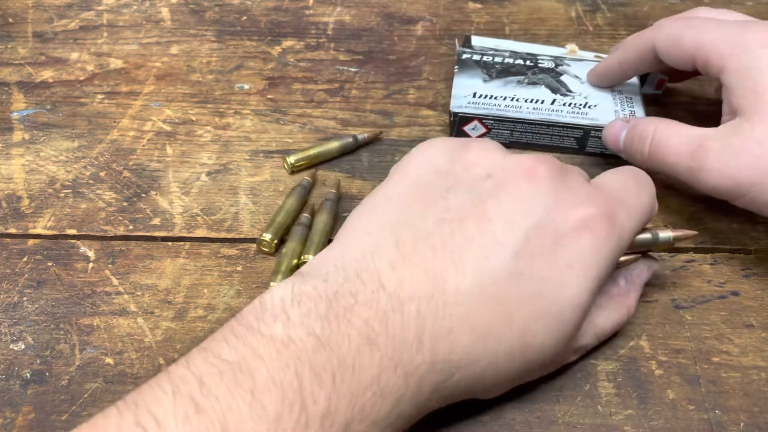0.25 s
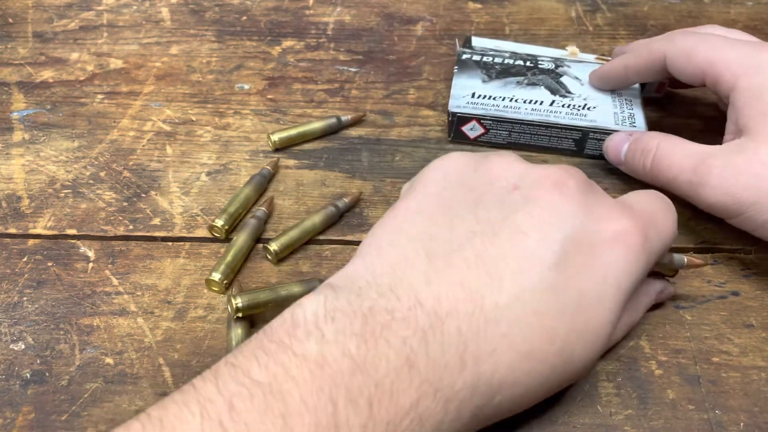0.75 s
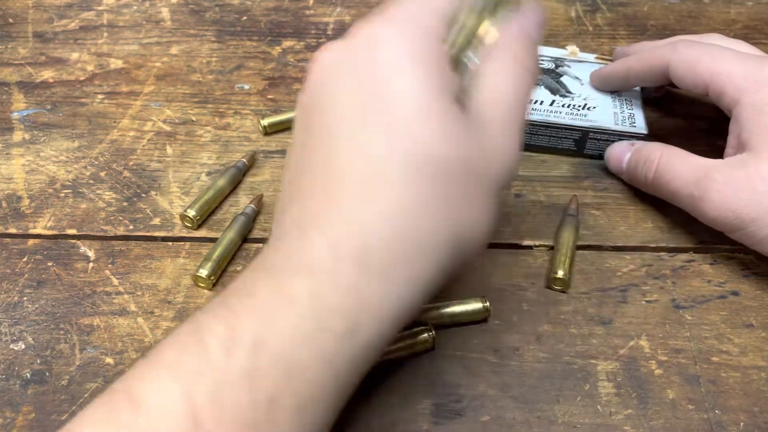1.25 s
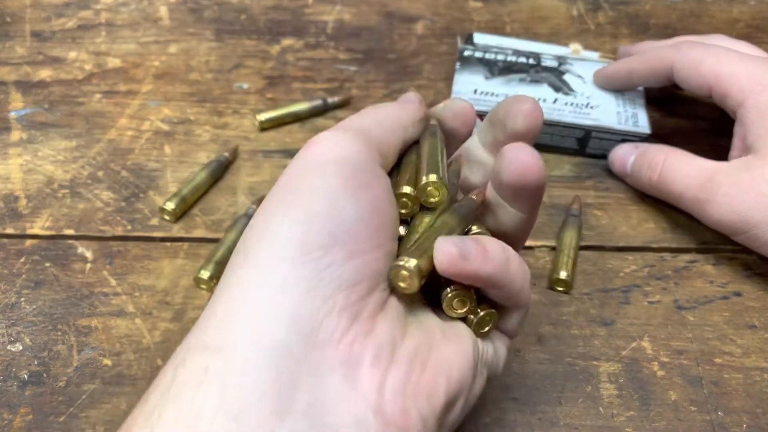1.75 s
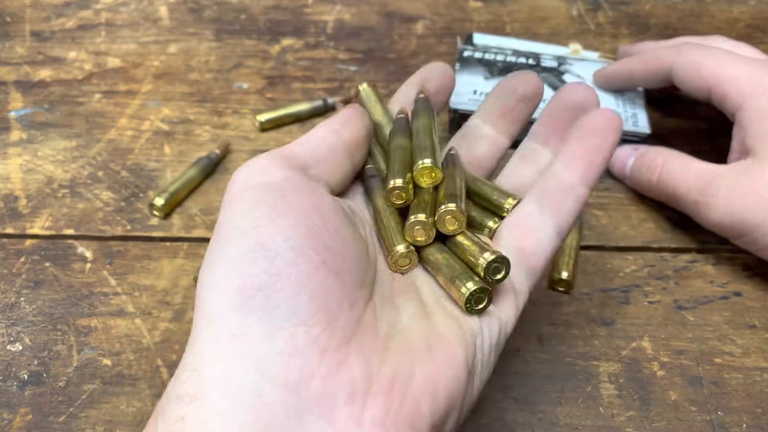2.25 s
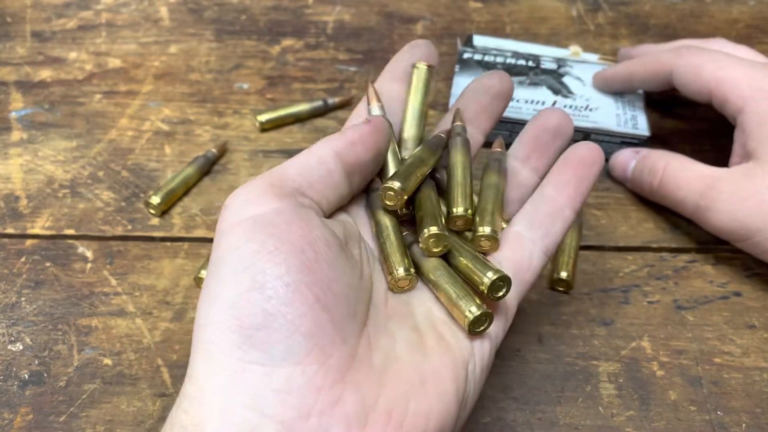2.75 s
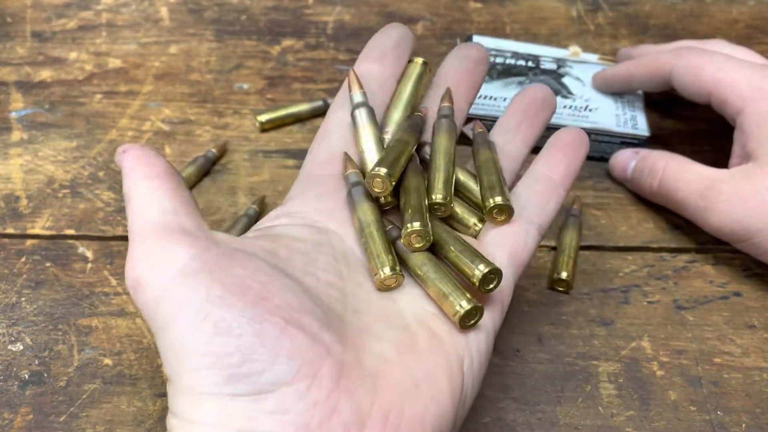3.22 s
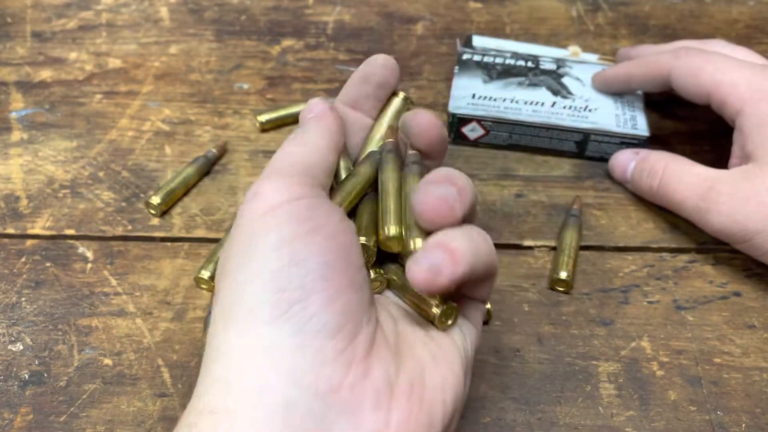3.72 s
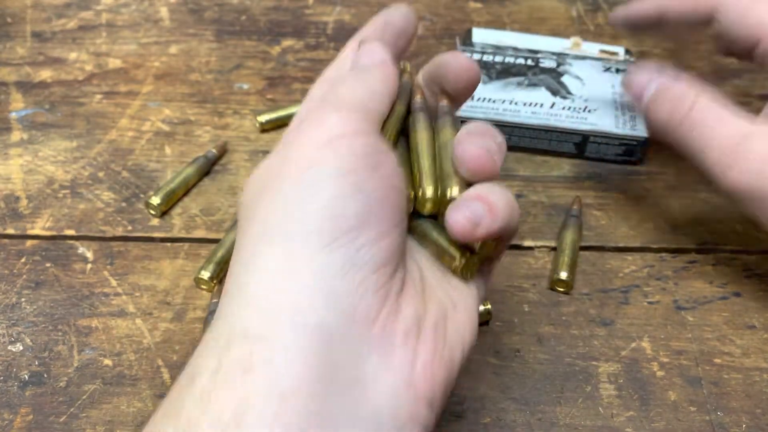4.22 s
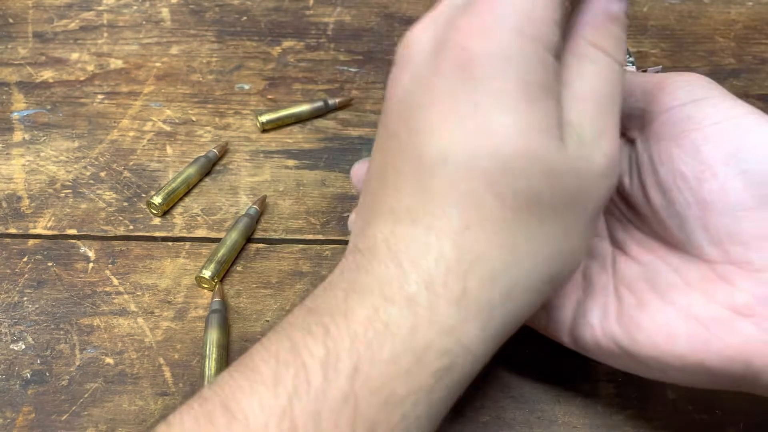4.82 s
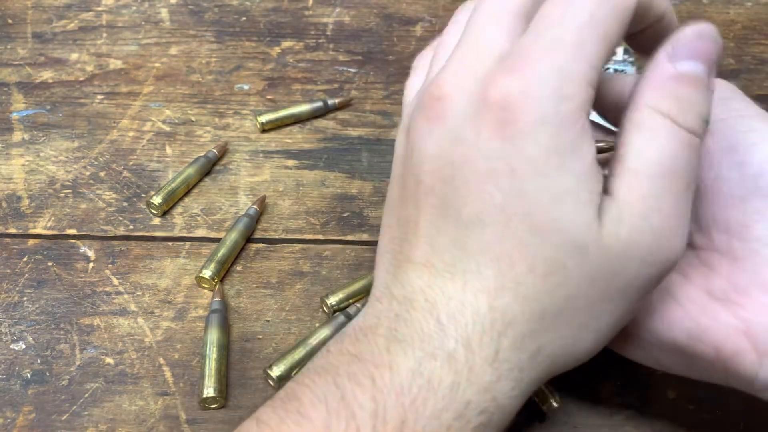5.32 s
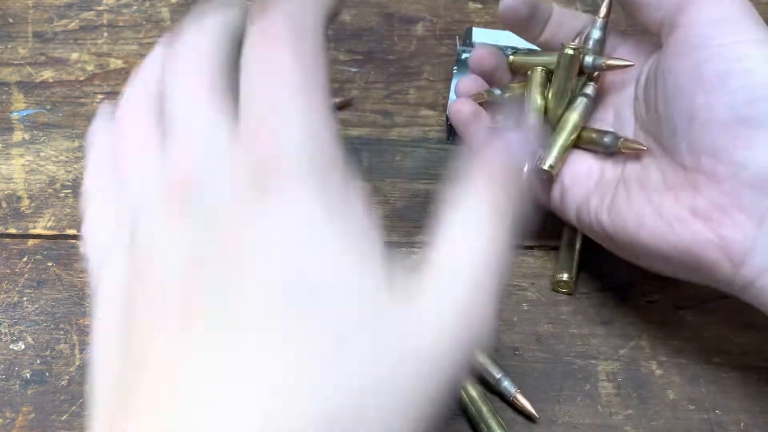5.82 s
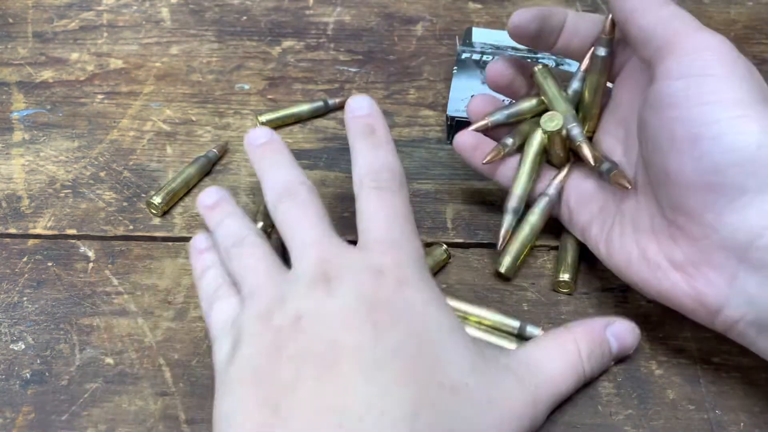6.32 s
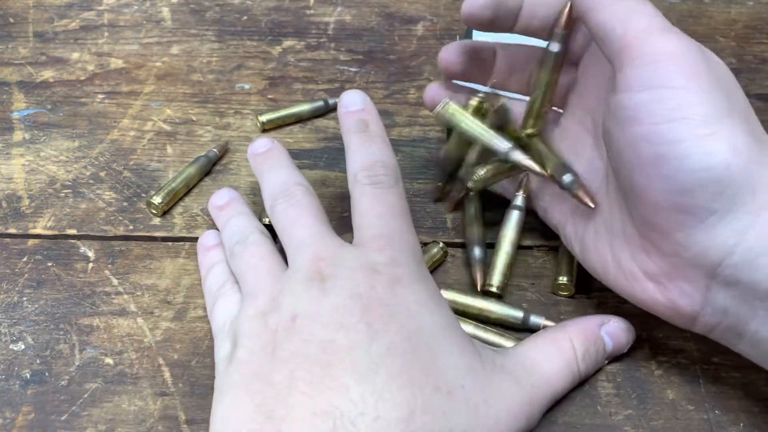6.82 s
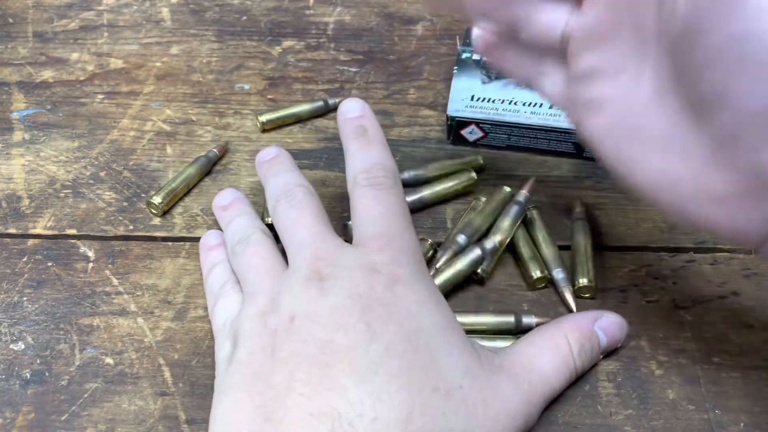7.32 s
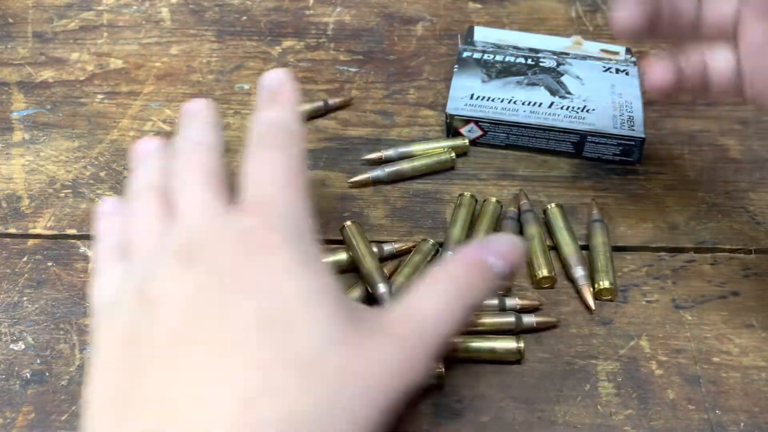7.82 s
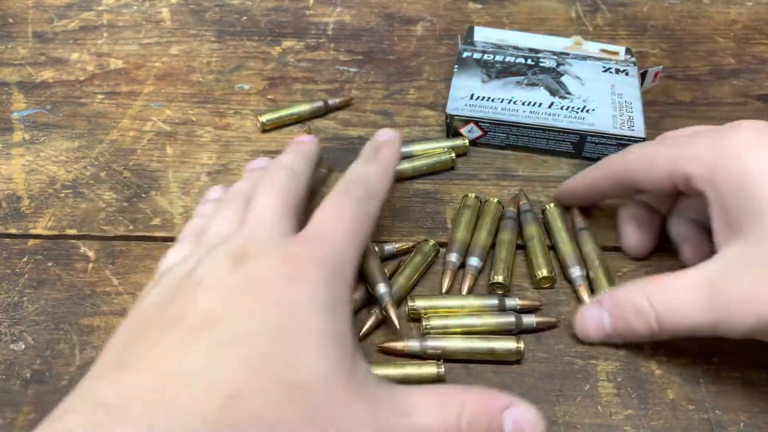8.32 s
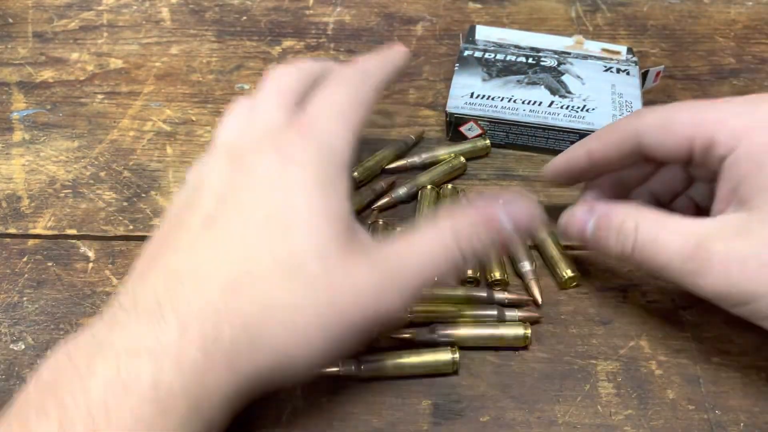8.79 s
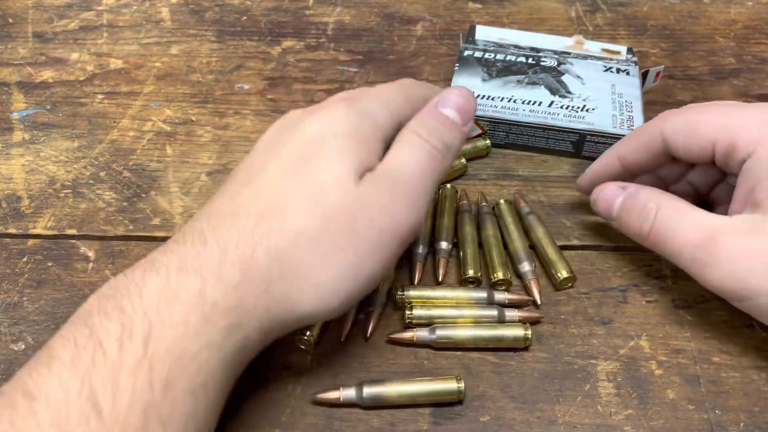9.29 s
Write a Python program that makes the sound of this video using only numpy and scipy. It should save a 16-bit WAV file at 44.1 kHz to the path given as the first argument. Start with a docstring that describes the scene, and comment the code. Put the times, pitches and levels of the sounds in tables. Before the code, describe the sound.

A handful of brass rounds is scooped, jiggled and poured back onto a wooden table.

```python
"""Hands move brass rifle cartridges over a wooden table, close to a small stereo microphone in a small room.
At first cartridges knock and roll on booming boards while skin slides on wood and brass clinks in three high modes.
From about 1.2 s clinks, faint jingles and short dull taps go on; a soft low thump comes now and then.
Dense knocks and clinks return from 5.2 to 5.6 s and from 6.1 to 7.6 s, then lighter handling follows to the end.
Impacts are dying modes and noise bursts, slides are shaped noise; a short room tail and faint air lie under all."""
import sys
import numpy as np
from scipy import signal
from scipy.fft import rfft, irfft, next_fast_len
from scipy.io import wavfile
from scipy.ndimage import uniform_filter1d

SR = 44100
rng = np.random.default_rng(int(sys.argv[2]) if len(sys.argv) > 2 else 0)


def bounce(signal):
    """Save signal as a 16-bit WAV file at the path given by the first command-line argument."""
    frames = np.transpose(np.atleast_2d(signal))
    limited = np.clip(frames, -1, 1)
    pcm = np.round(limited * 32767).astype(np.int16)
    wavfile.write(sys.argv[1], SR, pcm)


def voltage_ratio(decibels):
    """Convert decibels (scalar or array-like) to amplitude ratios, 20 dB per decade."""
    exponent = np.asarray(decibels, float) / 20
    return 10 ** exponent


N = 421140

# a cartridge lands on the table:
# (time [s], nominal knock peak [dB], boom over knock [dB], snap over knock [dB], favoured table mode [Hz])
LANDINGS = [(0.002, -31.5, -4, -7, 775), (0.163, -6.5, -20.5, -4, 1350), (0.309, -31, -9, -1, 1470),
            (0.338, -19, -16, -12, 1673), (0.369, -19.5, -15, -12, 1740), (0.408, -14, -4.5, -25, 1140),
            (0.434, -9.5, -14.5, -17, 1140), (0.507, -12.5, -11, -14.5, 1410), (0.529, -22, -15, -20, 1160),
            (0.551, -16.5, -5, -7.5, 1140), (0.586, -21.5, -20, -6.5, 1140), (0.605, -33, -2, -16, 1140),
            (0.68, -39, -9, -7, 1490), (0.743, -29.5, -5.5, -1.5, 517), (0.847, -35, -1, -5.5, 446),
            (0.974, -28, -2, -37, 690), (1.034, -26, 2, -38, 910), (1.053, -9, -14, -17, 865),
            (1.094, -11.5, -11, -18, 874), (1.133, -16.5, -9, -16, 1180), (1.157, -25, -6, -21, 1210),
            (5.214, -4, -12, -26, 1672), (5.247, -16, -15, -32, 476), (5.298, -3, -11, -5.5, 1710),
            (5.352, -4, -11.5, -39, 642), (5.371, -14, -19, -28, 1650), (5.424, -14, -22, -20, 1710),
            (5.455, -18.5, -6, -19, 528), (5.487, -18.5, -7, -16, 1640), (5.499, 4, -18.5, -11, 1665),
            (5.539, -33, -11, 8, 1620), (5.56, -11, -11.5, 4.5, 1646), (5.588, -19.5, -6, -2, 1610),
            (6.143, -32, -8, -24, 1590), (6.205, -30.5, -1, -28, 690), (6.242, -28.5, 2, -29, 1090),
            (6.277, -13.5, -6, -45, 880), (6.309, -23.5, -3.5, -32, 603), (6.353, -14, -3.5, -41, 900),
            (6.474, -27, -8, -27, 1547), (6.49, -29.5, -6, -33, 760), (6.655, -49, 6.5, -25, 300),
            (6.805, -17, -10, -20, 876), (6.812, -7, -17, -33, 390), (6.822, -10.5, -16, -37, 1276),
            (6.889, 0.5, -12.5, -27, 1233), (6.934, -25, -10, -22, 1060), (6.955, -11.5, -10, -23, 1000),
            (6.991, -9, -8, -7, 1320), (6.996, 1, -12, -10, 1265), (7.013, -8, -19, -16, 1220),
            (7.038, -10, -9, -18, 1315), (7.054, -8, -15, -16, 1280), (7.074, -12, -5, -21.5, 1220),
            (7.128, -17.5, -4, -21, 1250), (7.174, -5, -11, -9.5, 1180), (7.208, -8.5, -11, 2, 1260),
            (7.267, -18.5, -4.5, -1, 1270), (7.29, -13.5, -9.5, 2.5, 1860), (7.316, -25.5, -16, 7.5, 1012),
            (7.388, -12.5, -16, -3, 1310), (7.423, -10.5, -8.5, -13, 1640), (7.438, -25, -3, -4, 1600),
            (7.463, -12, -12, -20, 1230), (7.495, -12, -18, -19, 680), (7.531, -7, -14, -19.5, 1314),
            (7.557, -13.5, -9, -20, 1280), (7.593, -14, -19.5, -17.5, 900), (7.616, -18.5, -18, -29, 1370),
            (7.638, -21, -13, -19, 857), (7.826, -39, -11, -22, 1460), (7.922, -44, -13, -7, 420),
            (7.97, -31.5, -8, -36, 426), (8.03, -40, -2, -25, 454), (8.143, -40, 0, -27, 460),
            (8.194, -38.5, -0.5, -20, 423), (8.262, -34.5, -14, -21, 438), (8.276, -30.5, -3, -25, 413),
            (8.323, -31, -11, -9, 760), (8.439, -28.5, -1.5, -32, 770), (8.462, -30, -7, -25, 470),
            (8.522, -28, -3.5, -25, 440), (8.537, -27.5, -12, -25, 1180), (8.564, -26, -6, -32, 740),
            (8.592, -35, -7, -24, 416), (8.619, -32.5, -2, -32, 443), (8.635, -43, -2, -26, 430),
            (8.725, -29, 2, -33, 730), (8.751, -10.5, -15, -29, 1284), (8.768, -17, -26, -10, 1074),
            (8.778, -23.5, -2, -22, 1050), (8.792, -20.5, -10, -22, 915), (8.806, -24.5, -6, -22, 920),
            (8.952, -22, -1, -37, 824), (8.972, -13, -8.5, -21.5, 852), (8.993, -25, -1, -26, 830),
            (9.023, -22, -3, -18, 655), (9.057, -28, -5, -28, 856), (9.093, -27.5, -1, -36, 800),
            (9.138, -28.5, -12, -33, 1166), (9.271, -32, -15, -7, 1090), (9.405, -39, 2, -10, 523)]
# a hand pushes over the table, levels at the top of the swell:
# (start [s], length [s], rolling [dB], skin on wood [dB], skin on brass [dB])
HAND_PUSHES = [(-.15, 0.34, -39, -44.5, -52), (.2, 0.6, -45, -44.5, -60), (.7, 0.53, -52, -92, -79),
               (1.14, 0.29, -50, -85, -63.5), (4.1, 0.42, -64.5, -66, -66), (5.72, 0.25, -65, -58, -56.5),
               (5.93, 0.57, -49.5, -55, -55.5), (6.5, 0.28, -56.5, -99, -99),
               (6.93, 0.69, -40.5, -32.5, -58), (7.75, 0.59, -52.5, -75, -66.5),
               (8.2, 0.62, -38.5, -74, -54.5), (8.72, 0.194, -53, -48, -54.5), (8.9, 0.4, -41.5, -81, -71),
               (9.2, 0.42, -46, -88, -60)]
# a handful of cases shifts and jingles, levels at the top of the swell:
# (start [s], length [s], rattle [dB], skin on brass [dB])
HANDFUL_SHAKES = [(.3, 0.4, -53.5, -82.5), (1.3, 0.51, -77, -78.5), (1.68, 0.22, -61, -73),
                  (2.0, 0.25, -54, -83), (2.45, 0.16, -55, -70.5), (2.8, 0.68, -90, -86),
                  (3.38, 0.32, -55, -69), (3.8, 0.23, -68, -67.5), (4.82, 0.35, -44.5, -59.5),
                  (5.09, 0.36, -36, -43), (6.08, 0.11, -63, -59), (6.97, 0.31, -42, -49.5),
                  (8.36, 0.09, -64, -73), (9.17, 0.18, -65, -60)]
HIT_CREST_DB = 13  # nominal peak of a knock or tap over its early rms


def evened(x, span=None):
    """Scales to rms 1 over the first span samples."""
    return x / np.sqrt(np.mean(x[..., :span] ** 2) + 1e-20)


def read(points, hz):
    """Reads a curve on a log-frequency axis."""
    f, value = np.transpose(points)
    return np.interp(np.log(hz + 1), np.log(f + 1), value)


def add(mix, s, sound):
    """Mixes a sound into both channels at time s."""
    part = mix[:, round(s * SR):][:, :sound.shape[1]]
    part += sound[:, :part.shape[1]]


def colour(x, points):
    """Filters by a spectrum in dB."""
    size = x.shape[-1]
    return irfft(rfft(x) * voltage_ratio(read(points, np.fft.rfftfreq(size, 1 / SR))), size)


def band_pass(x, edges_hz, order):
    """Keeps one band of a sound."""
    return signal.sosfilt(signal.butter(order, edges_hz, "band", fs=SR, output="sos"), x)


def pair(size):
    """Two channels of noise whose likeness changes with frequency, which sets the stereo width."""
    # likeness of left and right in scattered sound: (frequency [Hz], correlation [0-1])
    likeness = [(60, 0.75), (150, 0.89), (300, 0.61), (650, 0.077), (1400, 0.84), (3000, 0.12),
                (6000, 0.98), (9000, 0.94)]
    left, other = rfft(rng.standard_normal((2, size)))
    same = np.clip(read(likeness, np.fft.rfftfreq(size, 1 / SR)), 0, 1)
    right = same * left + np.sqrt(1 - same ** 2) * other
    return irfft(np.array([left, right]), size)


def scatter(per_s, spread_db):
    """Random small impacts, a few of them large."""
    size = voltage_ratio(spread_db * np.minimum(rng.exponential(1, N), 4))
    return size * (rng.random(N) < per_s / SR) * rng.choice([-1., 1.], N)


def note(hz, t60, rise_s, size=4096):
    """One dying mode, a little apart in phase left and right."""
    t = np.arange(size) / SR
    turn = rng.random() + 0.076 * rng.standard_normal((2, 1))
    envelope = voltage_ratio(-60 * t / t60) * (1 - np.exp(-t / rise_s))
    return evened(envelope * np.sin(2 * np.pi * (hz * t + turn)), span=400)


def gesture(rows, column):
    """Level of one layer: every gesture swells and fades as a sine arch raised to a power."""
    t = np.arange(N) / SR
    return sum(voltage_ratio(row[column]) * np.sin(np.pi * np.clip((t - row[0]) / row[1], 0, 1)) ** 1.6 for row in rows)


def after_landing(layer):
    """Level of one layer that follows each landing: its power jumps and dies exponentially."""
    # levels under the landing's peak: (rolling [dB], hiss of the boards [dB], hiss on brass [dB])
    layer_db = [-21.5, -21, -50]
    decay_s = 0.24  # t60
    s, db = np.transpose(LANDINGS)[:2]
    kicks = np.bincount((s * SR).astype(int), voltage_ratio(2 * db), N)
    power = signal.lfilter([1], [1, -voltage_ratio(-120 / decay_s / SR)], kicks)
    return voltage_ratio(layer_db[layer]) * np.sqrt(power)


def board_blow(size=10000):
    """One struck spot: bending waves, plank modes and dense small modes, split in boom, thud, knock and snap."""
    # modes of the table, scattered from blow to blow: (centre [Hz], relative level [dB], t60 [s])
    boards = [(100.2, -6.5, 0.16), (113, 3, 0.17), (138.6, -3, 0.11), (262, 3, 0.12), (293, 3, 0.12),
              (403.3, -10, 0.12), (475.5, -3, 0.064), (546, -3.5, 0.088), (692, -4, 0.09), (886, -2, 0.09),
              (1065, 0, .08), (1160, -2, .07), (1270, 1, 0.1), (1410, -2, .06), (1500, -1, 0.064),
              (1670, 1, 0.07), (2150, -7.5, 0.057), (2450, -8, 0.045), (2710, -9, 0.07), (3377, -11, 0.038)]
    # bands of boom, thud, knock and snap: (low edge [Hz], high edge [Hz])
    bands_hz = [(85, 175), (185, 550), (550, 1800), (1800, 4600)]
    t, hz = np.arange(size) / SR, np.fft.rfftfreq(size, 1 / SR)
    # bending waves spread: treble arrives first, bass some ms later
    bend = irfft(np.exp(2j * np.pi * 1.3 * rng.uniform(0.8685, 1.1) * -np.log(hz + 30)), size)
    bend = 80 * bend * np.exp(-t / 0.04)
    # the plank edges send the wave back within a few ms, which gives each spot its colour
    echoes = np.zeros((2, 200))
    echoes[:, 0] = 1
    delays = rng.integers(20, 170, 4) + rng.integers(0, 8, (2, 4))
    echoes[[[0], [1]], delays] = rng.uniform(.3, .7, 4) * rng.choice([-1, 1], 4)
    bend = signal.oaconvolve(bend[None], echoes, axes=1)[:, :size]
    ring = np.zeros((2, size))
    for f, db, t60 in boards:
        # left and right drift apart in phase towards the higher modes
        turn = rng.random() + 0.2 * min(f, 700) / 700 * rng.standard_normal((2, 1))
        rise = 1 - np.exp(-(t * f / 1.2) ** 2)
        level = voltage_ratio(db + 3.2 * rng.standard_normal() - 60 * t / t60)
        ring += rise * level * np.sin(2 * np.pi * (f * rng.normal(1, .004) * t + turn))
    # the many small modes merge into noise, with a duller, longer tail
    dull = signal.lfilter(*signal.butter(2, 2400, fs=SR), pair(size))
    dense = pair(size) * voltage_ratio(-2 - 60 * t / .012) + dull * voltage_ratio(-10 - 60 * t / .15)
    dense *= 1 - np.exp(-(t / .002) ** 2)
    whole = 3.4 * bend + 1.9 * ring + 2.0 * dense
    spans = (2400, 1200, 400, 400)
    return np.array([evened(band_pass(whole, edge, 4), span=span) for edge, span in zip(bands_hz, spans)])


def table():
    """Knocks land on changing spots, each favouring one mode; rolling cases add a run of tiny bumps."""
    thud_db, thud_per_db = -10.5, 0.78  # the thud grows slower than the knock
    spot_db, spot_s = -7, .04  # level under the knock and t60 of the favoured mode
    spots, out = [board_blow() for _ in range(14)], np.zeros((2, N))
    for (s, db, boom, snap, hz), spot in zip(LANDINGS, rng.integers(0, 14, len(LANDINGS))):
        band_db = np.array([db + boom, thud_db + thud_per_db * db, db, db + snap])
        add(out, s, np.tensordot(voltage_ratio(band_db - HIT_CREST_DB), spots[spot], 1))
        add(out, s, voltage_ratio(db + spot_db - HIT_CREST_DB) * note(hz, spot_s, 0.0085))
    rolling = np.zeros((2, N))
    bump_gains = voltage_ratio(np.array([-5, 4.5, 1.5, -23.5]))  # boom, thud, knock, snap
    for spot in spots[:4]:
        bump = np.tensordot(bump_gains, spot, 1)
        rolling += signal.oaconvolve(scatter(50, 3.7)[None], bump, axes=1)[:, :N]
    return out + evened(rolling) * (gesture(HAND_PUSHES, column=2) + after_landing(layer=0))


def hiss():
    """Sliding skin and cases hiss smoothly; after each knock the boards also hiss as the blow dies away."""
    # spectra of the hiss: (frequency [Hz], relative level on wood [dB], relative level on brass [dB])
    spectra = [(150, -1, -37), (400, -8, -29), (920, 7, -4.5), (2200, -1, -4), (2990, -4.5, -7),
               (4900, -36.5, -6), (7600, -27.5, -6), (11000, -53, -12), (15450, -52.5, -19.5)]
    hz, wood_db, brass_db = np.transpose(spectra)
    on_wood = evened(colour(pair(N), list(zip(hz, wood_db))))
    on_brass = evened(colour(pair(N), list(zip(hz, brass_db))))
    wood_level = gesture(HAND_PUSHES, column=3) + after_landing(layer=1)
    brass_level = gesture(HAND_PUSHES, column=4) + gesture(HANDFUL_SHAKES, column=3) + after_landing(layer=2)
    return on_wood * wood_level + on_brass * brass_level


def air():
    """Room air is a faint steady noise, strongest in the bass."""
    # spectrum: (frequency [Hz], relative density [dB per Hz])
    spectrum = [(18, -34), (30, 3.5), (124, -5.5), (189, -14), (252, -11.5), (328, -17), (364, -13.5),
                (649, -28.5), (16000, -36)]
    return voltage_ratio(-72.5) * evened(colour(pair(N), spectrum))


def clink(tick_db, *ring_dbs, size=4096):
    """A tick that bounces twice; each mode rings in three touching cases, so it beats and flutters."""
    # modes of a cartridge, scattered from case to case: (centre [Hz], t60 before the grip of the fingers [s])
    case_modes = [(8050, 0.014), (12150, 0.016), (15520, 0.05)]
    # weaker modes that go with the tick, scattered: (centre [Hz], level against the tick's rms [dB], t60 [s])
    weak_modes = [(3190, -22, 0.032), (4840, -20, 0.02), (5500, -34.5, .025), (5870, -18.5, 0.022),
                  (6970, -14.5, 0.02), (11300, -14.5, 0.023)]
    # spectrum of the tick: (frequency [Hz], relative level [dB])
    tick_spectrum = [(200, -54.5), (500, -34.5), (1000, -18), (1600, -4.5), (3000, -7), (5000, 5.5),
                     (7000, 5), (8200, 6), (9800, 1), (11000, -16), (14000, -14.5), (16000, -18.5)]
    t = np.arange(size) / SR
    shape = voltage_ratio(-60 * t / 0.006) * (1 - np.exp(-t / 0.0003))
    late, soft = rng.random((2, 2))
    for s, db in zip(0.00085 + 0.006 * late, -6 - 12 * soft):
        shape = shape + voltage_ratio(db - 60 * (t - s) / .005) * (t > s)
    tail = voltage_ratio(-34.5 - 60 * t / 0.18)
    tick = evened(colour(pair(size) * (shape + tail), tick_spectrum), span=120)
    hz, db, t60 = np.transpose(weak_modes)[:, :, None]
    draw = rng.standard_normal((2, len(weak_modes), 1))
    weak = voltage_ratio(db + 4.5 * draw[0] - 60 * t / t60) * np.sin(2 * np.pi * hz * (1 + 0.044 * draw[1]) * t)
    tick += weak.sum(0)
    sound = voltage_ratio(tick_db) * evened(tick, span=120)
    for (hz, t60), db in zip(case_modes, ring_dbs):
        draw = rng.standard_normal((4, 3, 1))
        grip = np.exp(0.4 * np.minimum(draw[1], .8))  # fingers damp some cases more
        decay = voltage_ratio(4 * draw[2] - 60 * t / (t60 * grip))
        cases = decay * np.sin(2 * np.pi * (hz * (1 + .012 * draw[0]) * t + draw[3]))
        chatter = 1 + 0.4 * evened(uniform_filter1d(rng.standard_normal(size), 70))
        sound += voltage_ratio(db) * evened(cases.sum(0) * chatter * (1 - np.exp(-t / 0.0001)), span=130)
    return sound


def brass():
    """Brass strikes brass in clear clinks and brief rings, over a rattle of tiny clinks."""
    # the clear clinks, nominal peaks:
    # (time [s], tick [dB], low case mode [dB], middle case mode [dB], high case mode [dB])
    clear_clinks = [(0.01, -27.5, -38, -53.5, -49.5), (0.021, -36.5, -35, -51.5, -54),
                    (0.0406, -43.5, -41, -64.5, -57.5), (0.162, -34.5, -58, -60, -61),
                    (0.3032, -43, -43, -74, -55.5), (0.3316, -43.5, -38.5, -60, -45.5),
                    (0.339, -26, -36.5, -41, -32.5), (0.3423, -24, -37, -41, -40),
                    (0.4003, -27.5, -21, -49, -48), (0.4054, -26, -21, -34, -31.5),
                    (0.4121, -36.5, -17.5, -48.5, -36.5), (0.4794, -38, -39, -62, -54),
                    (0.4948, -38.5, -44, -55, -55.5), (0.5517, -42, -40.5, -57, -55),
                    (0.5643, -34, -46, -41, -47.5), (0.5762, -32, -42, -56, -44.5),
                    (0.588, -40, -47, -48, -53), (0.7442, -31, -41, -50, -43),
                    (0.8416, -37.5, -50, -69, -68.5), (0.8514, -43, -49, -64, -62),
                    (1.0872, -32, -46, -43, -43), (1.124, -43, -41, -51, -52), (1.251, -46, -64, -59, -68),
                    (1.3236, -55, -47.5, -68, -53), (1.3418, -34.5, -27.5, -66, -55.5),
                    (1.416, -48, -38, -69, -50), (1.6084, -28, -13, -30, -18.5),
                    (1.6688, -40.5, -46, -49, -49), (1.7149, -42, -25.5, -45, -29),
                    (1.7262, -40, -34, -47, -50), (1.7353, -27.5, -18.5, -39, -36),
                    (1.82, -42.5, -30.5, -30, -31), (1.8229, -33.5, -31, -30, -36),
                    (1.8556, -46, -52, -51.5, -55.5), (1.8787, -34.5, -33, -31, -37.5),
                    (1.8942, -52, -48.5, -44, -56), (1.9087, -26, -25.5, -23.5, -21.5),
                    (1.9168, -24.5, -25, -30, -29.5), (1.924, -21, -18.5, -23, -32.5),
                    (2.0509, -38, -42.5, -51, -43), (2.09, -38.5, -22.5, -50, -41),
                    (2.0967, -35, -24.5, -33.5, -28.5), (2.1035, -41.5, -32, -41, -35),
                    (2.233, -42.5, -59, -53, -64), (2.279, -48, -53, -60, -54),
                    (2.304, -38, -39.5, -53, -61), (2.349, -36, -20.5, -40, -33.5),
                    (2.355, -39, -36, -55, -45), (2.3668, -43, -40.5, -61, -54),
                    (2.4874, -19, -17, -28.5, -18.5), (2.558, -55, -51, -71, -68),
                    (2.584, -42, -41, -63, -47), (2.5875, -45, -56, -56, -37),
                    (2.6315, -34, -27, -52, -35.5), (2.6437, -42, -44, -52, -53),
                    (2.671, -25, -21.5, -33.5, -28), (2.674, -27, -36, -40, -39),
                    (2.68, -28, -37.5, -45, -39), (2.6949, -43, -33.5, -47, -49),
                    (2.7209, -53, -28, -48, -38.5), (2.7565, -38, -46, -57, -53),
                    (2.761, -45, -43.5, -67, -56), (2.8748, -50, -47, -52.5, -43),
                    (3.004, -50.5, -53.5, -78, -62), (3.0362, -46.5, -56.5, -70, -68),
                    (3.0642, -43.5, -44, -62.5, -58), (3.114, -37.5, -31, -55.5, -47),
                    (3.1398, -43, -58.5, -68, -64.5), (3.1568, -43.5, -52, -66, -65),
                    (3.3914, -58, -25.5, -44.5, -36.5), (3.3987, -46.5, -39, -57, -44),
                    (3.4359, -50.5, -31.5, -57, -54), (3.4629, -36.5, -25, -44.5, -28),
                    (3.474, -34.5, -40, -41, -38), (3.486, -25, -26.5, -34, -32.5),
                    (3.5687, -42.5, -43, -61, -61.5), (3.592, -49, -44, -60, -74),
                    (3.612, -29.5, -49, -43, -36), (3.6558, -33.5, -48, -58, -54),
                    (3.669, -47, -60, -62, -57), (3.6844, -31, -51, -43, -51), (3.7492, -41, -44, -57, -46),
                    (3.887, -33, -54.5, -55, -63), (3.8924, -34, -30, -63, -60),
                    (3.9044, -38, -45, -67, -74), (3.928, -33.5, -27, -55, -52),
                    (3.9341, -29.5, -37, -39.5, -43.5), (3.954, -35.5, -41, -48, -51),
                    (4.0023, -45.5, -45, -53, -51), (4.1032, -44.5, -67, -59, -65),
                    (4.7768, -46, -47, -60, -60), (4.791, -36, -44, -45, -38),
                    (4.7973, -32.5, -34, -53, -49), (4.8336, -39.5, -29, -55.5, -61),
                    (4.8499, -47, -32, -44, -56.5), (4.8683, -34.5, -23, -31, -44),
                    (4.8846, -35.5, -39, -35, -45), (4.906, -34.5, -15, -42, -28),
                    (4.9226, -35.5, -19.5, -30, -27), (4.956, -47, -25, -35, -27),
                    (4.969, -24.5, -20, -28, -22.5), (5.0078, -33, -26, -44.5, -41),
                    (5.0142, -33, -14.5, -29, -31.5), (5.0225, -27.5, -18.5, -35, -38),
                    (5.1, -29.5, -25, -34, -29.5), (5.1165, -24, -12.5, -32, -40.5),
                    (5.1441, -27, -38, -33, -25), (5.1498, -28, -26, -38, -25.5),
                    (5.164, -29, -28, -29, -29), (5.1751, -31.5, -24, -33.5, -35.5),
                    (5.197, -32, -24, -30, -27.5), (5.215, -38, -28.5, -43.5, -36),
                    (5.2245, -27, -18, -34.5, -35.5), (5.2398, -25, -13, -34.5, -17),
                    (5.2601, -45.5, -20, -38.5, -24.5), (5.2661, -39.5, -18, -35, -28.5),
                    (5.2803, -40.5, -23, -31, -23.5), (5.2844, -41, -15, -39, -36.5),
                    (5.3004, -20.5, -23, -40, -28.5), (5.3046, -29, -10.5, -42.5, -40.5),
                    (5.3633, -41, -40, -55.5, -53), (5.3807, -46, -37, -50, -48),
                    (5.402, -37.5, -30, -57, -48.5), (5.5003, -10.5, 2.5, -16, -12),
                    (5.6059, -34, -27, -55, -42), (5.704, -40, -33, -46, -47), (5.727, -45, -45, -65, -61),
                    (5.767, -41, -45, -55, -61), (5.8527, -41, -60.5, -54, -62),
                    (6.101, -42.5, -37, -66, -54), (6.1238, -48, -26, -59, -52),
                    (6.131, -46.5, -35, -75, -64), (6.144, -37.5, -38, -62, -47.5),
                    (6.1713, -43, -46, -63, -59.5), (6.181, -35, -26.5, -55, -38),
                    (6.1962, -36, -33, -58, -48), (6.2149, -39.5, -32, -55, -60),
                    (6.224, -40, -27, -49, -38.5), (6.2375, -31, -18.5, -37, -26.5),
                    (6.2605, -33, -22, -46, -39), (6.272, -44, -34, -49.5, -45),
                    (6.3253, -50, -25.5, -51, -39), (6.3358, -32, -38, -43, -38),
                    (6.4727, -39, -47.5, -36, -56), (6.6587, -48, -57.5, -51, -65),
                    (6.776, -39, -42, -68.5, -80), (6.803, -28.5, -46, -30, -31),
                    (6.816, -24.5, -42, -54, -50), (6.8212, -27.5, -28.5, -38, -46.5),
                    (6.8414, -28.5, -21, -37, -42), (6.853, -45, -34, -42, -41),
                    (6.8764, -34, -20.5, -30, -40), (6.904, -28, -18, -33, -21),
                    (6.9305, -27, -22, -37.5, -28.5), (6.9353, -40, -27, -36, -34),
                    (6.9607, -26, -28, -53.5, -36), (6.9684, -25.5, -30, -33, -26.5),
                    (6.991, -24.5, -15, -37, -29.5), (7.0008, -25.5, -18, -29, -21),
                    (7.016, -25.5, -13, -32, -24), (7.0448, -26.5, -17, -32, -17.5),
                    (7.0664, -30.5, -15, -30, -17.5), (7.0777, -33, -16.5, -34, -23),
                    (7.0977, -41, -26, -44, -34), (7.129, -25.5, -17, -33, -29.5),
                    (7.143, -27, -13, -28, -18), (7.1488, -30.5, -16.5, -32, -21),
                    (7.1653, -28, -22.5, -26, -19), (7.1753, -20.5, -7, -32.5, -20),
                    (7.1783, -17.5, -19, -36.5, -29), (7.184, -27, -18.5, -34.5, -30.5),
                    (7.2, -33, -20.5, -48, -35), (7.2097, -18.5, -31, -45, -38),
                    (7.235, -27.5, -24, -44, -30.5), (7.293, -8.5, -43, -54, -40),
                    (7.389, -28.5, -24, -53, -29.5), (7.4364, -38, -37, -42, -47),
                    (7.4788, -33, -32, -60, -40), (7.5026, -31, -32, -54, -35),
                    (7.587, -31.5, -36, -51, -45), (7.803, -49.5, -55, -82, -70),
                    (7.8877, -43.5, -61, -67, -68), (8.195, -28, -19, -41, -26),
                    (8.2626, -25, -17.5, -42.5, -28.5), (8.3082, -30, -40, -35, -28),
                    (8.3403, -37, -40, -57, -35.5), (8.375, -25.5, -15, -39.5, -26.5),
                    (8.4082, -24, -25.5, -41, -40.5), (8.4164, -20.5, -34, -42, -44.5),
                    (8.4345, -42, -37, -52, -51), (8.4574, -24, -20, -40, -28),
                    (8.4666, -27, -30, -47, -34), (8.519, -36, -22, -35, -35.5),
                    (8.5227, -23, -27, -43, -34), (8.5443, -41, -36, -57, -46),
                    (8.5628, -17.5, -19, -31, -26), (8.6277, -42, -32, -55, -45),
                    (8.7417, -42, -26, -54, -36.5), (8.9213, -41, -37, -59, -55),
                    (8.93, -41, -40, -61, -40), (9.1808, -29.5, -19, -48, -30), (9.227, -43, -28, -57, -34),
                    (9.2347, -49, -36, -61, -48), (9.2806, -47, -26, -61, -57),
                    (9.2894, -32, -28, -59, -50), (9.3028, -45, -31, -63, -53.5),
                    (9.35, -37, -21, -48, -34.5), (9.3852, -34, -29, -55, -40),
                    (9.3982, -40, -25, -60, -49.5), (9.4114, -34, -26, -52, -40),
                    (9.4516, -34.5, -36, -46, -37), (9.4746, -42, -39, -64, -76),
                    (9.5002, -35, -24.5, -46, -37)]
    # rms under the peak: (low case mode [dB], middle case mode [dB], high case mode [dB])
    ring_rms_db = [-3.5, -5, -5]
    # a loosely held cartridge or the cupped palm rings briefly: (time [s], early rms [dB], pitch [Hz], t60 [s])
    brief_rings = [(4.754, -72.5, 3150, 0.062), (4.788, -51, 3250, .06), (4.816, -58, 3400, .05),
                   (4.862, -58.5, 447, .15), (4.865, -51, 3040, .03), (4.884, -53.5, 3060, 0.027),
                   (2.465, -60, 874, .03)]
    tick_crest_db = 7.5  # nominal peak of a tick over its rms
    out = np.zeros((2, N))
    for s, tick_db, *ring_dbs in clear_clinks:
        add(out, s, clink(tick_db - tick_crest_db, *np.add(ring_dbs, ring_rms_db)))
    for s, db, hz, t60 in brief_rings:
        add(out, s, voltage_ratio(db) * note(hz, t60, 0.0022))
    rattle = np.zeros((2, N))
    for _ in range(3):
        tiny = clink(-11.5, 0, -11.0, -14.5)
        rattle += signal.oaconvolve(scatter(110, 3.0)[None], tiny, axes=1)[:, :N]
    return out + evened(rattle) * gesture(HANDFUL_SHAKES, column=2)


def room(x):
    """The room answers with a noisy tail, each band dying at its own speed."""
    # decay of the room: (frequency [Hz], t60 [s])
    decay = [(100, 0.5), (300, 0.54), (700, 0.51), (1800, 0.42), (5000, 0.32), (12000, 0.1), (16000, 0.27)]
    hz, t, z = signal.stft(pair(SR // 2), SR, nperseg=256)
    tail = signal.istft(z * voltage_ratio(-60 * t / read(decay, hz)[:, None]), SR, nperseg=256)[1]
    tail *= 1 - np.exp(-(np.arange(tail.shape[1]) / SR / 0.0024) ** 2)  # soft onset
    tail /= np.linalg.norm(tail[0])
    return voltage_ratio(-9.5) * signal.oaconvolve(x.mean(0)[None], tail, axes=1)[:, :N]


def thumps():
    """A palm or wrist settles on the table: a soft low sine that dies fast."""
    # (time [s], level before a common lift [dB], pitch [Hz])
    settlings = [(1.605, -57.5, 153), (4.399, -43, 106), (5.986, -34.5, 104.7), (6.597, -35.5, 136),
                 (7.967, -35.5, 102), (8.175, -28.5, 68.6), (8.797, -24.5, 108)]
    lift_db = 6.5
    out, t = np.zeros((2, N)), np.arange(8000) / SR
    for s, db, hz in settlings:
        envelope = voltage_ratio(db + lift_db - 60 * t / 0.1) * (1 - np.exp(-t / 0.014))
        add(out, s, np.tile(envelope * np.sin(2 * np.pi * hz * t), (2, 1)))
    return out


def taps():
    """Dull taps hardly ring: each is a short noise puff with a hollow note."""
    # dull short taps, most in the palm or on the carton, a few perhaps on the table:
    # (time [s], nominal peak of the mids [dB], bass over mids [dB], snap over mids [dB], hollow note [Hz])
    dull_taps = [(1.608, -41.5, 7, -22, 725), (1.717, -42.5, -30, 6.5, 1530),
                 (1.734, -43.5, -27, 8.5, 1520), (1.82, -40, -23, 2.5, 2010), (1.878, -50.5, -18, 4, 1620),
                 (1.919, -42.5, -19, -15, 1780), (2.049, -48, -23.0, -16, 1460),
                 (2.098, -67, -19, -5.5, 1793), (2.467, -41.5, -7, -10, 896), (2.381, -58.5, -25, 6, 1500),
                 (2.486, -31.5, -9, -5, 1000), (2.496, -42, -18, 0, 1200), (2.545, -53.5, -14, -14, 1100),
                 (2.584, -51, -11, -12, 1090), (2.63, -43, -26, -5, 1790), (2.673, -58, -32, 0, 1600),
                 (2.874, -58, -23, -23, 1596), (3.474, -41.5, -26, -9, 1770), (3.609, -43, -35, -5.0, 1766),
                 (3.639, -52.5, -26, -10, 1170), (3.668, -46, -34.0, -16.0, 1314),
                 (3.683, -48, -43, 9.5, 1895), (3.751, -47.5, -21, 6.5, 1200),
                 (3.848, -48, -31, -7.0, 1770), (3.884, -57, -26.5, 8.0, 1870),
                 (3.932, -46.5, -40, 9.5, 1440), (3.952, -49, -27, 1, 1800),
                 (4.008, -45.5, -39.5, -1, 1604), (4.102, -39.0, -7, -21.0, 850),
                 (4.112, -45, -23, -24, 1200), (4.121, -33.5, -15, -20.0, 1580),
                 (4.125, -36, -10, -12, 1620), (4.133, -39, -21, -12, 1650), (4.14, -55, -18, -11, 1370),
                 (4.79, -58.5, -24, 20, 1680), (4.866, -39, -11, 5, 1860), (4.882, -39, -8, 3.5, 1690),
                 (5.101, -38.5, -33, 5, 1940), (5.711, -45, -18, 13.5, 1910)]
    # bands of bass, mids and snap: (low edge [Hz], high edge [Hz])
    bands_hz = [(150, 800), (800, 1900), (1900, 3600)]
    tap_s, tail_s, tail_db = .016, 0.18, -28  # t60 of the puff and of its tail, and the tail's level
    hollow_db, hollow_s = -4, .018  # level under the mids and t60 of the hollow note
    out, t = np.zeros((2, N)), np.arange(4096) / SR
    shape = (voltage_ratio(-60 * t / tap_s) + voltage_ratio(tail_db - 60 * t / tail_s)) * (1 - np.exp(-t / 0.0026))
    for s, db, bass, snap, hz in dull_taps:
        add(out, s, voltage_ratio(db + hollow_db - HIT_CREST_DB) * note(hz, hollow_s, 0.0016))
        puff = pair(len(t)) * shape
        for edge, band_db in zip(bands_hz, (db + bass, db, db + snap)):
            add(out, s, voltage_ratio(band_db - HIT_CREST_DB) * evened(band_pass(puff, edge, 3), span=400))
    return out


def scene():
    """Table, hiss, brass, thumps and taps in the room, over faint air."""
    near = table() + hiss() + brass() + thumps() + taps()
    return near + room(near) + air()


def top_cut(x):
    """Nothing passes above the cut-off."""
    return signal.sosfilt(signal.butter(12, 17160, fs=SR, output="sos"), x)


def record(dry):
    """Two ports turn the treble apart in phase; band limits, a limiter and a soft clip shape the sound."""
    # phase between the ports: (frequency [Hz], lead of the left [rad])
    port_phase = [(0, 0), (6200, -.1), (7700, -3.0), (9400, -3.4), (10400, -6.2), (12700, -6.5),
                  (14000, -9.3), (15600, -9.85), (17000, -9.4)]
    # balance of the ports: (frequency [Hz], left over right [dB])
    balance = [(60, -1), (180, 0), (550, 1.5), (1650, 0), (4970, 2.5), (15000, 1)]
    rumble_hz, top_hz = 44.3, 16400  # band limits
    limit_db, recovery_db_per_s = -7, 110.0
    size = next_fast_len(N + 2048)
    hz = np.fft.rfftfreq(size, 1 / SR)
    f, lead = np.transpose(port_phase)
    # each port takes half of the difference
    half = voltage_ratio(read(balance, hz) / 2) * np.exp(.5j * np.interp(hz, f, lead))
    band = 1 / (1 + (hz / top_hz) ** 90) / np.sqrt(1 + (rumble_hz / (hz + 1)) ** 2)
    ports = irfft(rfft(dry, size) * np.array([half, 1 / half]) * band, size)[:, :N]
    power_db = 10 * np.log10(abs(uniform_filter1d((ports ** 2).mean(0), 130)) + 1e-12)
    fall = np.arange(N) * recovery_db_per_s / SR
    held_peak_db = np.maximum.accumulate(power_db + fall) - fall
    over_db = np.maximum(held_peak_db - limit_db, 0)
    # the limiter takes off 85 % of the excess in dB, then tanh clips softly
    held = np.tanh(ports / voltage_ratio(.85 * uniform_filter1d(over_db, 60)))
    return top_cut(held)


dry = scene()
out = record(dry)
bounce(out)
```